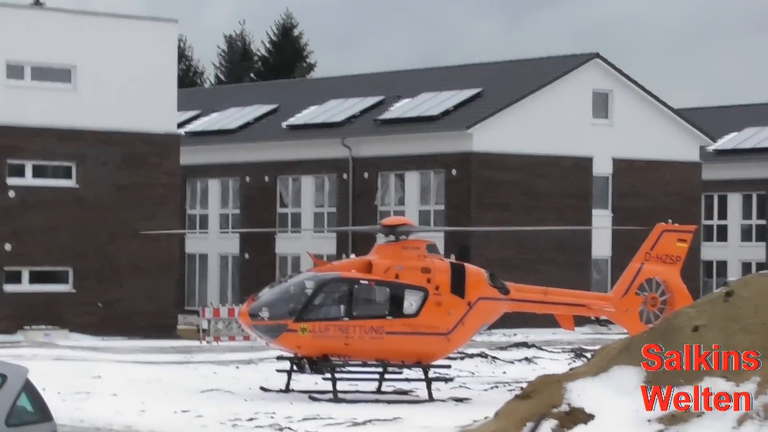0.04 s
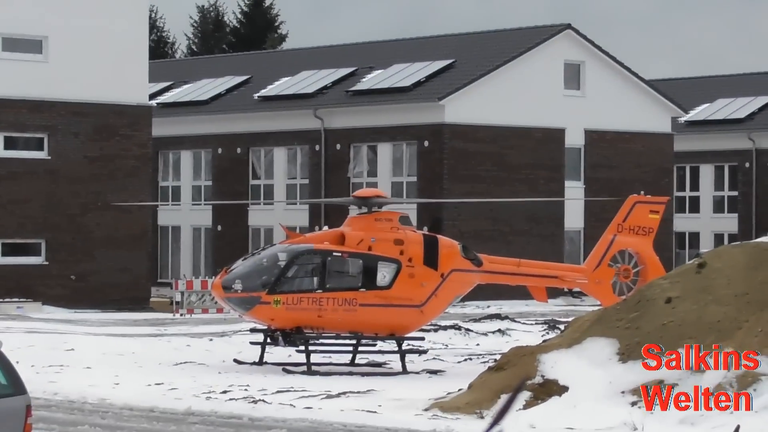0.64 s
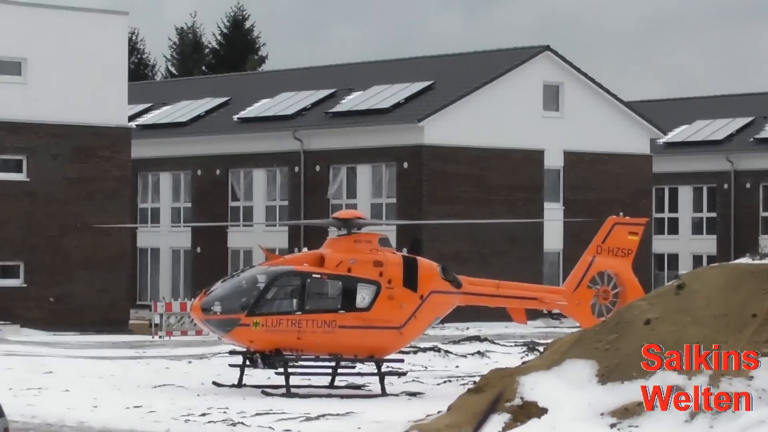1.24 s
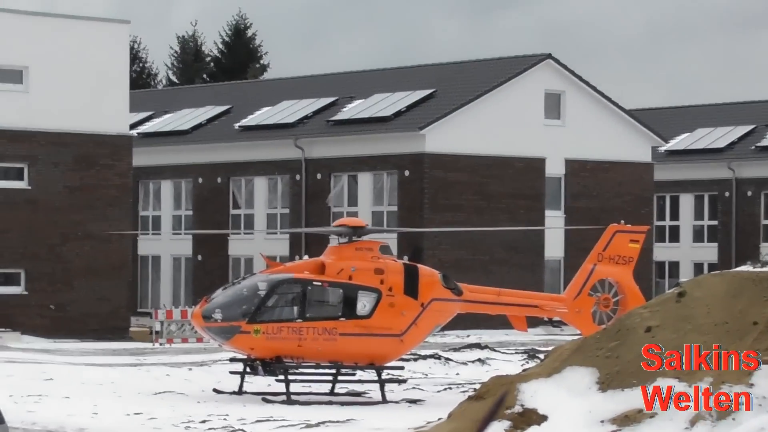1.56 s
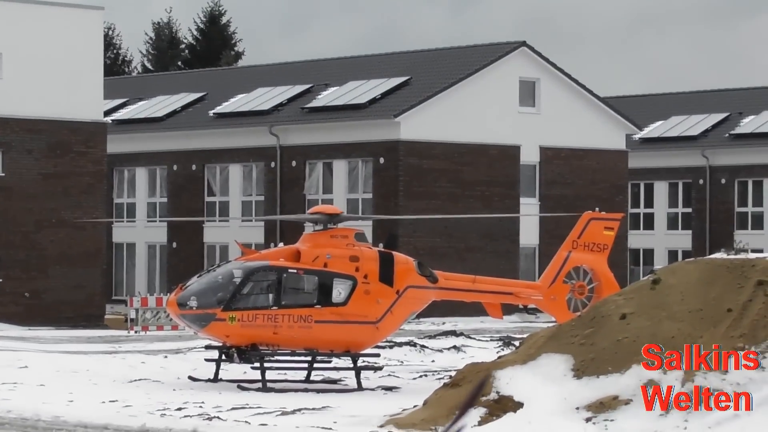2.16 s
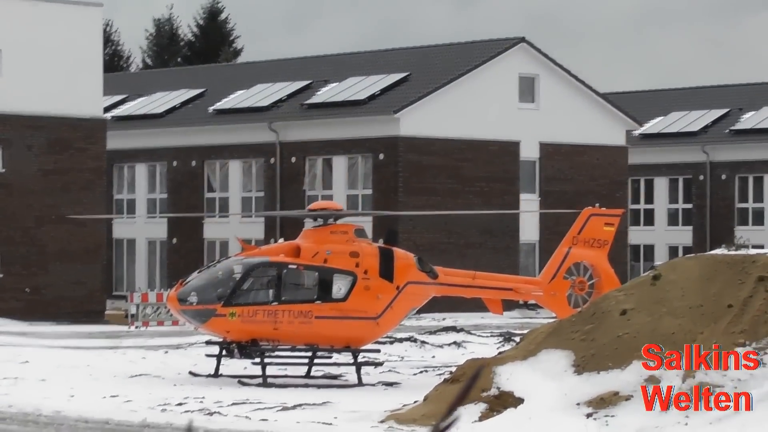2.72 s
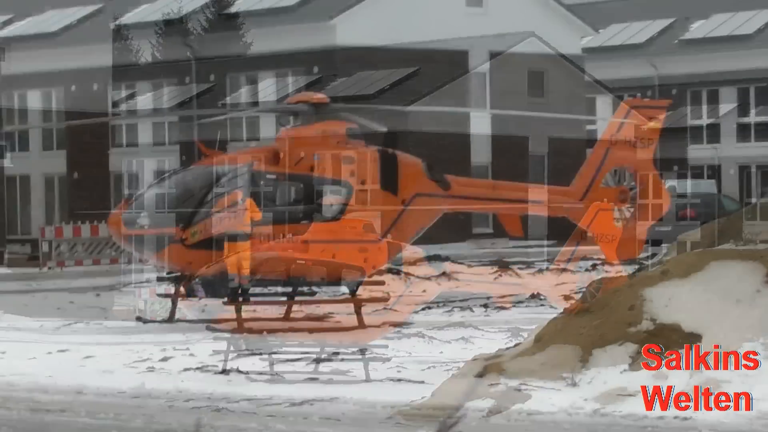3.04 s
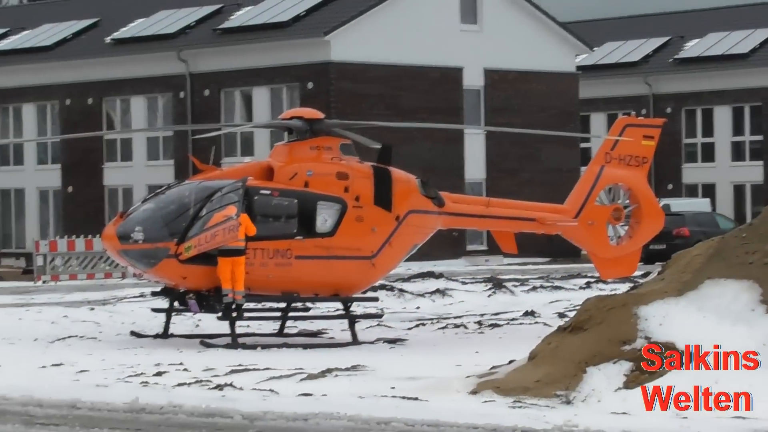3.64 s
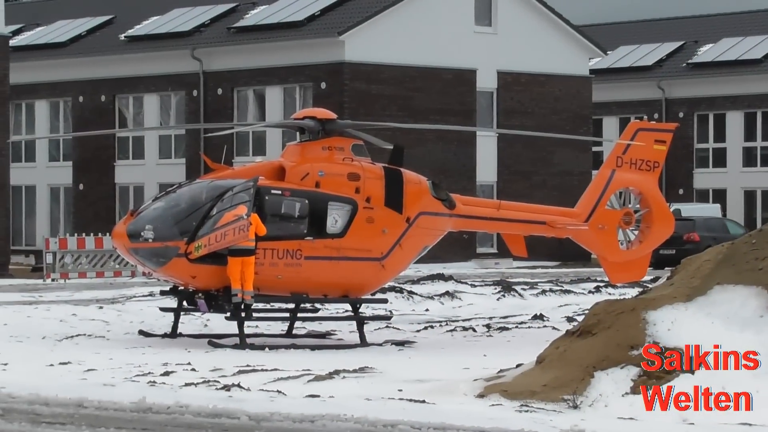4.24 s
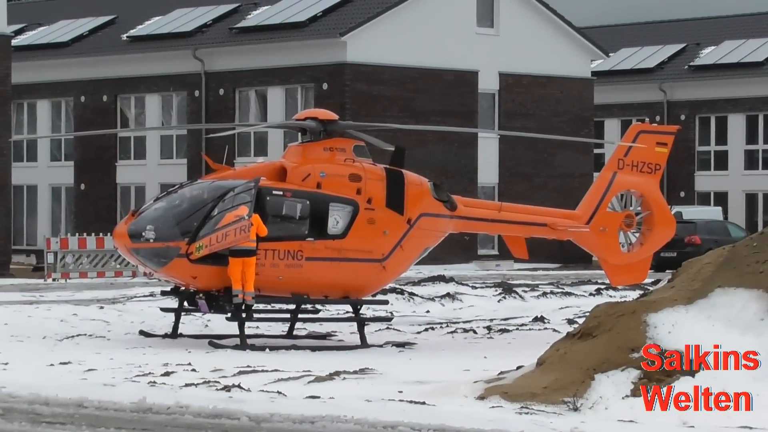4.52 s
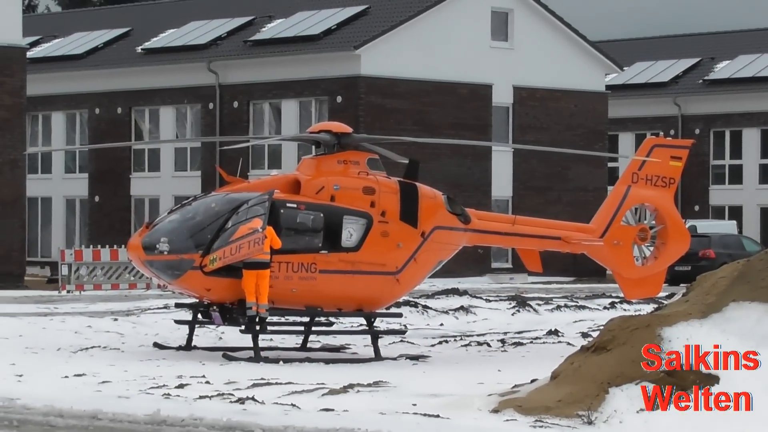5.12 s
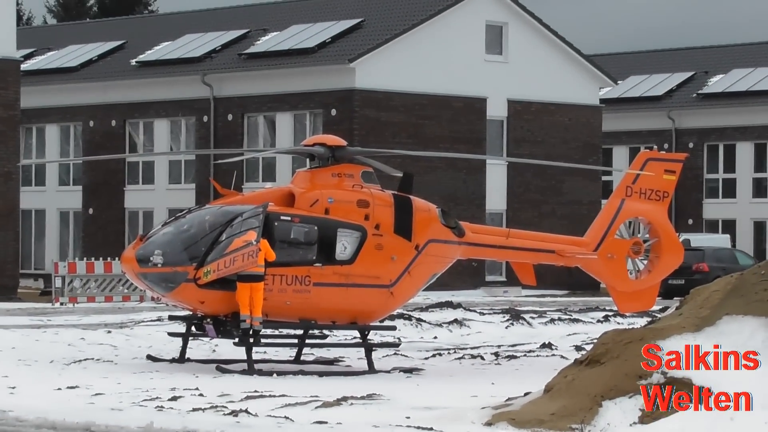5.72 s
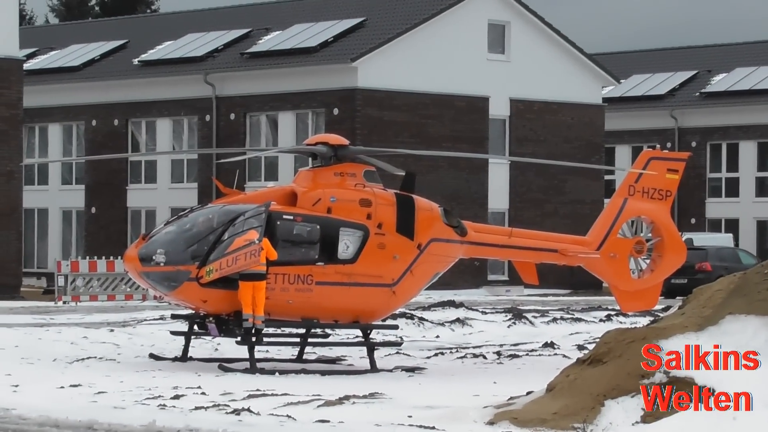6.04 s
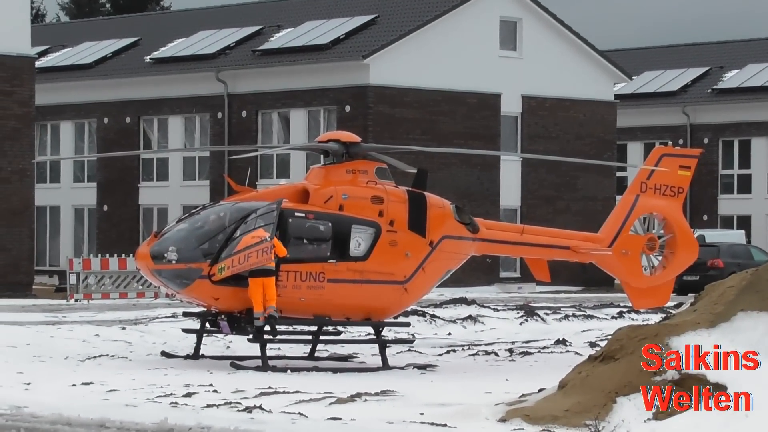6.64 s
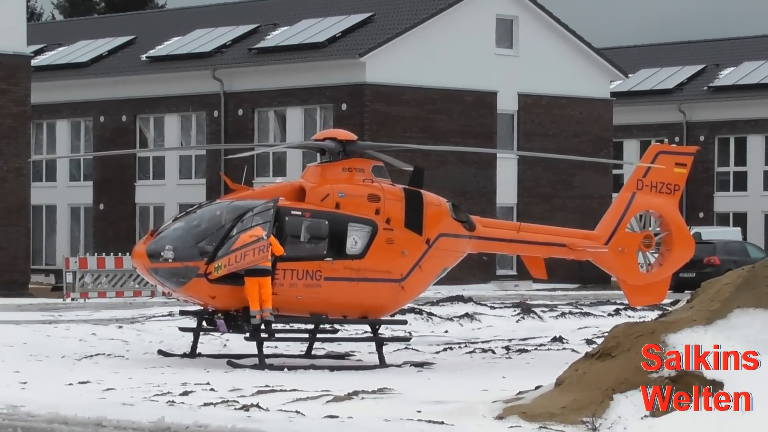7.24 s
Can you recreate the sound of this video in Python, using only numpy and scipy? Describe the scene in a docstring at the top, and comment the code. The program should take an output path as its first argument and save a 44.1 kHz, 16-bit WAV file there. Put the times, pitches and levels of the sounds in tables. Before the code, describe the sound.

A helicopter idles on the ground outdoors, its exhaust roaring steadily with a light blade flutter, a high turbine whine and a hiss. After about three seconds the sound cuts with a click to a much quieter, dull rumble and low hum. Close to the microphone a faint rustle grows, with soft bumps, small ticks and scrapes. Near the end come a faint high whistle and one firmer knock.

```python
"""A light twin-turbine helicopter idles on snow in front of a building: turbulent exhaust roars, four
blades beat the air, compressors whine, intakes hiss, gears and tail fan sing. At 3 s the sound cuts,
with a click, to a much quieter, dull rumble with a low hum. Close to the microphone a rustle grows, with
soft bumps, small ticks and scrapes. From 6.7 s a faint high whistle sounds for half a second; at 7 s one
firmer knock sets the camera housing shuddering."""
import sys
import numpy as np
from scipy import signal
from scipy.fft import rfft, irfft, next_fast_len
from scipy.io import wavfile
from scipy.ndimage import uniform_filter1d

SR = 44100
rng = np.random.default_rng(int(sys.argv[2]) if len(sys.argv) > 2 else 0)


def unload_wav(signal):
    """Save mono or channel-first audio to the path in sys.argv[1] as 16-bit WAV at rate SR, clipped to [-1, 1]."""
    wavfile.write(
        sys.argv[1],
        SR,
        np.round(np.clip(np.atleast_2d(signal).T, -1, 1) * 32767).astype(np.int16),
    )


N = 320607
T = np.arange(N) / SR
FFT_SIZE = next_fast_len(N)
HZ = np.maximum(np.arange(FFT_SIZE // 2 + 1) * SR / FFT_SIZE, 1)
BLADE_PASS_HZ = 19.87

# Swells on the breeze: t/s, relative level/dB
EXHAUST_SWELLS = [(0.0, -27), (0.02, -21), (0.03, -26.5), (0.22, -23.5), (0.49, -25.5), (1.59, -25.5),
                  (1.8, -28), (2.59, -23.5), (2.64, -24), (2.66, -21.5), (2.89, -27), (3.0, -27)]
WHINE_SWELLS = [(0.0, -22.5), (0.19, -19.5), (0.64, -17), (0.88, -21.5), (1.02, -17.5), (1.07, -21),
                (1.7, -16.5), (2.04, -23), (2.05, -20), (2.14, -21), (2.47, -17), (2.63, -22), (2.76, -18),
                (2.97, -19), (3.0, -21.5)]
# Intake swells: t/s, relative body level/dB, relative top level/dB
HISS_SWELLS = [(0.0, -21, -26.5), (0.12, -23.5, -33.5), (0.54, -23.5, -36), (0.65, -20.5, -33),
               (0.82, -25.5, -34.5), (1.0, -20.5, -28), (1.09, -23, -32.5), (1.81, -22.5, -35),
               (1.84, -22, -31.5), (1.95, -20, -30.5), (2.0, -23.5, -38.5), (2.3, -25, -34.5),
               (2.31, -24.5, -33), (2.45, -26, -36), (2.78, -23.5, -37), (2.84, -21, -28.5),
               (2.89, -22.5, -33), (3.0, -24, -33)]
# Helicopter noise spectra: f/Hz, relative density/dB
EXHAUST_SPECTRUM = [(18, -16), (45, -10.5), (85, -2), (120, -8), (170, -11.5), (300, -0.5), (480, -3.5),
                    (650, -0.5), (900, -3.5), (1380, -5), (1750, -2.5), (2400, -6), (3300, -30)]
HISS_SPECTRUM = [(2200, -35), (3700, -7.5), (4200, -2), (4800, -5.5), (5500, -2.5), (6000, -2.5),
                 (6600, -4), (7400, 1), (8600, -1), (9500, -7), (10400, -8.5), (11700, -15.5),
                 (13600, -17.5), (15500, -24.5)]
# Compressor bands: f/Hz, width/Hz, relative level/dB
COMPRESSOR_BANDS = [(1763, 360, -17.5), (2600, 120, -9.5), (2790, 84, -9), (2970, 130, -6.5),
                    (3071, 91, -5.5), (3287, 85, -1.5), (3452, 80, -11), (3030, 1160, -14)]
# Shafts, gears, tail fan, compressor blades: f/Hz, level/dB, wander/Hz
MACHINE_TONES = [(91, -40.3, .7), (139, -49, .7), (298, -44, .7), (613.7, -36.3, .6), (1722, -38.5, 1.5),
                 (1872, -37.5, 1.5), (2660, -40.5, 3), (2772, -42, 8), (2976, -35.5, 5), (3057, -36, 8),
                 (3287, -28.3, 17), (4377, -38.5, 10), (4581, -46, 6), (5076, -46, 5), (6747, -45, 5),
                 (13496, -52, 6)]

# Quiet noise spectra: f/Hz, relative density/dB
RUMBLE_SPECTRUM = [(12, -37), (20, -13), (43, -4.5), (91, -7.5), (163, -8), (243, -10.5), (310, -10.5),
                   (357, -10), (383, -12), (592, -12.5), (1040, -23.5), (1300, -40), (1690, -67),
                   (2860, -120)]
AIR_SPECTRUM = [(1200, -14.5), (1450, -1), (1700, 1.5), (2500, -5), (3400, -7), (4400, -12), (5200, -17),
                (6200, -12.5), (7500, -9), (9500, -12.5), (15500, -14.5)]
RUSTLE_SPECTRUM = [(2500, -29), (4300, -8.5), (5300, -14.5), (6300, -4.5), (7500, -2), (8600, -7.5),
                   (10000, -21), (12500, -16), (15500, -36)]
TICK_SPECTRUM = [(700, -16), (1500, -15), (3200, -9.5), (4400, -8.5), (5300, -6), (7200, 3), (9000, -1),
                 (11500, -15), (15500, -21.5)]
# Low hum: f/Hz, level/dB, wander/Hz
HUM_TONES = [(55.4, -57, 5.2), (236.4, -52.5, 1.015), (258, -58.5, 3.1)]
# Short rubs: t/s, level/dB, half length/s
RUB_EVENTS = [(3.645, -57, .015), (4.51, -65, .035), (4.767, -61, .015), (4.835, -55, 0.017),
              (6.61, -55, 0.036), (6.744, -56.5, .02), (6.992, -58, .03)]
# Click at the abrupt cut (3.038 s), then close ticks and scrapes: t/s, tick level/dB, scrape level/dB
TICK_EVENTS = [(3.038, -29, -46), (4.822, -48, -47), (5.204, -48, -54), (5.271, -43, -57),
               (5.329, -51, -48), (5.42, -41, -57), (5.426, -41, -49), (5.472, -34, -51), (5.48, -48, -46),
               (5.618, -45, -49.5), (5.902, -52, -53), (6.372, -56, -55), (6.722, -50, -52),
               (6.784, -43, -53), (6.858, -48, -51), (6.89, -51, -53), (7.041, -35, -44), (7.116, -47, -60)]
# Bumps on the camera: t/s, f/Hz, level/dB, rise/s
BUMP_EVENTS = [(3.635, 42, -31.5, .022), (3.7, 85, -36.5, .02), (4.87, 52, -36, 0.032),
               (6.77, 50.4, -37, .03), (7.041, 180, -32, 0.0054)]

# Likeness of the two microphone ports: f/Hz, coherence/0-1
LOUD_COHERENCE = [(30, .3), (65, .25), (130, .62), (260, .9), (500, .94), (1500, .9), (3000, .975),
                  (4000, .995), (6000, .999), (8000, .98), (10000, .8), (13000, .68)]
QUIET_COHERENCE = [(30, 0.68), (70, 0.88), (260, .94), (550, 0.87), (1300, .68), (2000, 0.83), (3300, 0.99),
                   (6300, 1), (8000, 0.87), (10500, 0.061)]
# Port balance: f/Hz, left minus right/dB
LOUD_PAN = [(30, -7), (130, -4), (280, -5.5), (520, -3.5), (900, 0.2), (1300, -0.3), (1900, 3), (3200, 3),
            (3800, -1), (9000, -1.5), (13000, 2)]
QUIET_PAN = [(130, 0.5), (520, 1.8), (900, 3), (1700, 0), (9000, 0.5), (14000, -2)]
# Port phase: f/Hz, left lead/rad
LOUD_PHASE = [(35, -2.5), (70, -.3), (130, .1), (500, .6), (1300, .5), (1900, .37), (3000, .08), (4000, 0)]


def undb(db):
    """Decibels to gain."""
    return 10 ** (np.asarray(db) / 20)


def unit(x):
    """Scale to rms 1."""
    return x / np.sqrt(np.mean(x ** 2))


def over_time(rows):
    """Interpolate (t/s, value) rows."""
    return np.interp(T, *np.transpose(rows))


def over_hz(rows):
    """Interpolate (f/Hz, value) rows on a log axis."""
    hz, value = np.transpose(rows)
    return np.interp(np.log(HZ), np.log(np.maximum(hz, 1)), value)


def filtered(x, gain):
    """Apply a gain per frequency."""
    return irfft(rfft(x, FFT_SIZE) * gain, FFT_SIZE)[..., :N]


def noise(gain, coherence):
    """Coloured noise, rms 1, partly shared by the two ports."""
    shared = np.clip(over_hz(coherence), 0, 1)
    mid, side = rng.standard_normal((2, len(HZ))) + 1j * rng.standard_normal((2, len(HZ)))
    mid, side = mid * np.sqrt(1 + shared), side * np.sqrt(1 - shared)
    return unit(irfft(gain * np.array([mid + side, mid - side]), FFT_SIZE)[:, :N])


def drift(rate_hz):
    """Smooth random motion, rms 1."""
    hold = max(int(SR / rate_hz), 2)
    steps = np.repeat(rng.standard_normal(N // hold + 2), hold)
    return unit(uniform_filter1d(uniform_filter1d(steps, hold), hold)[:N])


def decay(start_s, decay_s):
    """Sudden onset, exponential fall."""
    return (T >= start_s) * np.exp(-np.maximum(T - start_s, 0) / decay_s)


def ports(x, pan, lead_rad=0):
    """Level and phase differences between left and right."""
    sides = np.array([[1], [-1]]) / 2
    return filtered(x, undb(sides * over_hz(pan)) * np.exp(1j * sides * lead_rad))


def exhaust(chop_depth=0.088, roar_db=1.5, rotor_db=-9.8, buffet_db=0.8):
    """Turbulent exhaust, lightly chopped by the blades, their flutter beneath."""
    lowpass = 1 / (1 + (HZ / 3500) ** 8)
    roar = noise(undb(over_hz(EXHAUST_SPECTRUM)) * lowpass, LOUD_COHERENCE)
    chop = 1 + chop_depth * np.cos(2 * np.pi * BLADE_PASS_HZ * T)
    mix = undb(roar_db) * roar * chop + undb(rotor_db) * rotor()
    return mix * undb(over_time(EXHAUST_SWELLS) + buffet_db * drift(12))


def rotor(low_hz=200, high_hz=438, echo_decay_s=0.12, uneven_db=1.5):
    """One pressure pulse per blade; ground and walls scatter it into a flutter."""
    passes_s = np.arange(0, N / SR, 1 / BLADE_PASS_HZ)
    pulses = np.zeros(N)
    pulses[(passes_s * SR).astype(int)] = undb(uneven_db * rng.standard_normal(len(passes_s)))
    band = HZ / (HZ + low_hz) / (1 + (HZ / high_hz) ** 4)
    scatter = rfft(noise(1, LOUD_COHERENCE) * np.exp(-T / echo_decay_s), FFT_SIZE)
    return unit(filtered(pulses, band * scatter / np.sqrt(abs(scatter))))


def compressors(trim_db=-0.76, flicker_db=0.73, flicker_hz=50):
    """Whine gathered into bands by turbulence, flickering in moving air."""
    power = sum(undb(db) ** 2 / (1 + (2 * (HZ - hz) / width_hz) ** 2) ** 2
                for hz, width_hz, db in COMPRESSOR_BANDS)
    whine = noise(np.sqrt(power), LOUD_COHERENCE)
    return whine * undb(over_time(WHINE_SWELLS) + trim_db + flicker_db * drift(flicker_hz))


def intakes(body_trim_db=0.08, top_trim_db=1.0, split_hz=9500):
    """Shimmering intake hiss; the top band swells and fades most."""
    colour = undb(over_hz(HISS_SPECTRUM))
    top_share = 1 / (1 + (split_hz / np.maximum(HZ, 1000)) ** 24)
    times_s, body_db, top_db = np.transpose(HISS_SWELLS)
    body = noise(colour * np.sqrt(1 - top_share), LOUD_COHERENCE)
    body *= undb(np.interp(T, times_s, body_db) + body_trim_db)
    top = noise(colour * np.sqrt(top_share), LOUD_COHERENCE)
    top *= undb(np.interp(T, times_s, top_db) + top_trim_db)
    return shimmer(body + top)


def shimmer(x, depth_db=1.5, frame_samples=512):
    """Moving air swells and fades narrow bands independently."""
    cells = signal.stft(x, nperseg=frame_samples)[2]
    swell = rng.standard_normal(cells.shape[1:])
    swell = uniform_filter1d(swell, size=4, axis=0)  # over frequency
    swell = uniform_filter1d(swell, size=24, axis=1)  # over time
    return signal.istft(cells * undb(depth_db * unit(swell)), nperseg=frame_samples)[1][:, :N]


def tones(rows, coherence, wander_rate_hz, fade_db, fade_rate_hz):
    """Machine tones waver and fade in moving air; reflections shift their phase between the ports."""
    out = 0
    for hz, db, wander_hz in rows:
        phase = 2 * np.pi * np.cumsum(hz + wander_hz * drift(wander_rate_hz)) / SR
        shared = np.clip(np.interp(hz, *np.transpose(coherence)), .1, 1)
        spread_rad = np.sqrt(-np.log(shared) / 2)
        phase = phase + np.array([[1], [-1]]) * spread_rad * drift(2)
        out += undb(db) * unit(np.sin(phase) * undb(fade_db * drift(fade_rate_hz)))
    return out


def rumble(roar_db=-40, waver_db=0.4, air_db=-57):
    """Dull, steady roar with faint treble air and a low hum."""
    roar = noise(undb(over_hz(RUMBLE_SPECTRUM)), QUIET_COHERENCE) * undb(roar_db + waver_db * drift(10))
    air = noise(undb(over_hz(AIR_SPECTRUM)), QUIET_COHERENCE) * undb(air_db)
    hum = tones(HUM_TONES, QUIET_COHERENCE, wander_rate_hz=8, fade_db=1.5, fade_rate_hz=7.3)
    return roar + air + hum


def rustle(full_db=-60, full_at_s=6.4, rise_db_per_s=5, grain_db=2.5, uneven_db=1.5):
    """Grainy rustle that grows, then holds; short rubs swell out of it."""
    envelope = undb(full_db - rise_db_per_s * np.maximum(full_at_s - T, 0))
    for at_s, db, half_s in RUB_EVENTS:
        rub = undb(db) * np.exp(-((T - at_s) / half_s) ** 2 / 2)
        envelope = np.hypot(envelope, rub)
    friction = noise(undb(over_hz(RUSTLE_SPECTRUM)), QUIET_COHERENCE)
    return friction * envelope * undb(grain_db * drift(150) + uneven_db * drift(25))


def ticks(tick_decay_s=0.00093, scrape_decay_s=0.011):
    """Click at the abrupt cut, then close ticks and scrapes: sharp noise bursts with short tails."""
    envelope = sum(undb(tick_db) * decay(at_s, tick_decay_s)
                   + undb(scrape_db) * decay(at_s, scrape_decay_s)
                   for at_s, tick_db, scrape_db in TICK_EVENTS)
    return envelope * noise(undb(over_hz(TICK_SPECTRUM)), QUIET_COHERENCE)


def bumps(skew_rad=0.24):
    """Soft bumps rock the two ports out of step."""
    port_phase = np.array([[skew_rad], [-skew_rad]])
    out = 0
    for at_s, hz, db, rise_s in BUMP_EVENTS:
        age_s = np.maximum(T - at_s, 0)
        envelope = undb(db) * age_s / rise_s * np.exp(1 - age_s / rise_s)
        out += envelope * np.sin(2 * np.pi * hz * age_s + port_phase)
    return out


def whistle(start_s=6.69, end_s=7.18, ramp_s=0.02, hz=13300, width_hz=450, db=-68):
    """Faint, very high whistle close by, perhaps the lens motor."""
    gate = np.clip(np.minimum(T - start_s, end_s - T) / ramp_s, 0, 1)
    band = 1 / (1 + (2 * (HZ - hz) / width_hz) ** 2)
    return undb(db) * gate * noise(band, QUIET_COHERENCE)


def knock(at_s=7.042, hz=161, width_hz=70, lowpass_hz=1600, db=-33.5, decay_s=0.072):
    """A firmer knock leaves the housing shuddering around a low resonance."""
    resonance = 1 / np.sqrt(1 + ((HZ - hz ** 2 / HZ) / width_hz) ** 2)
    lowpass = 1 / (1 + (HZ / lowpass_hz) ** 2)
    return undb(db) * decay(at_s, decay_s) * noise(resonance * lowpass, QUIET_COHERENCE)


def scene(loud_end_s=3.021, quiet_start_s=3.034, edge_s=0.002):
    """Loud helicopter, then an abrupt cut to the quiet rumble."""
    helicopter = exhaust() + compressors() + intakes()
    helicopter += tones(MACHINE_TONES, LOUD_COHERENCE, wander_rate_hz=25, fade_db=3.0, fade_rate_hz=20)
    loud = ports(helicopter, LOUD_PAN, over_hz(LOUD_PHASE))
    quiet = ports(rumble() + rustle() + ticks() + bumps() + whistle() + knock(), QUIET_PAN)
    fade_out = np.exp(-np.maximum(T - loud_end_s, 0) / edge_s)
    fade_in = np.exp(np.minimum(T - quiet_start_s, 0) / edge_s)
    return loud * fade_out + quiet * fade_in


def record(dry):
    """The camera's steep low-pass."""
    cutoff_hz = 15650
    return signal.sosfilt(signal.ellip(10, .2, 70, cutoff_hz, fs=SR, output="sos"), dry)


dry = scene()
out = record(dry)
unload_wav(out)
```